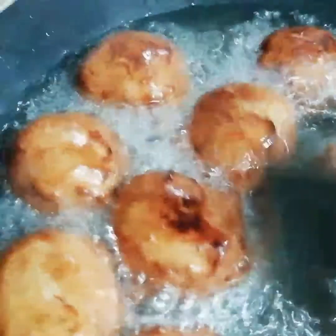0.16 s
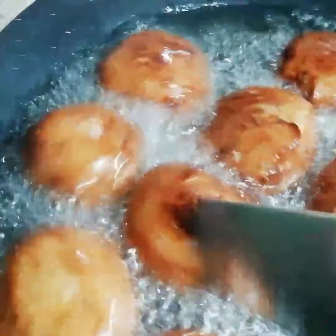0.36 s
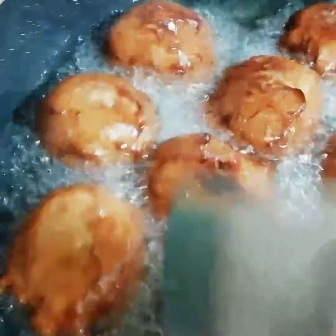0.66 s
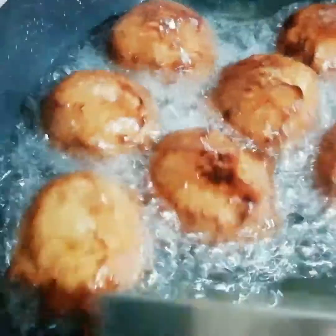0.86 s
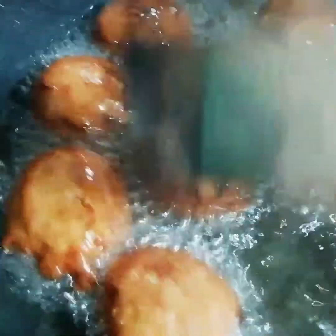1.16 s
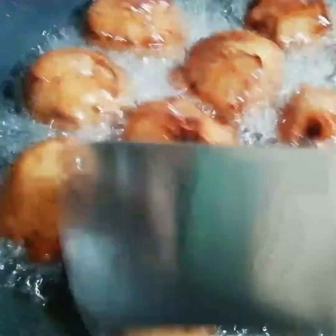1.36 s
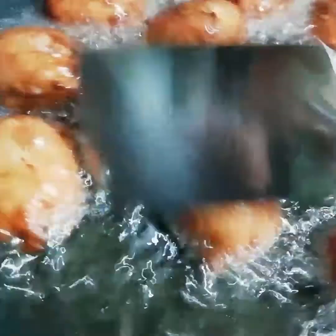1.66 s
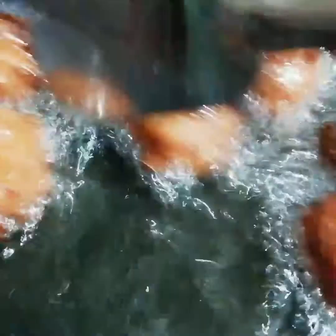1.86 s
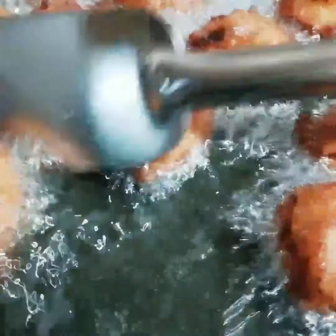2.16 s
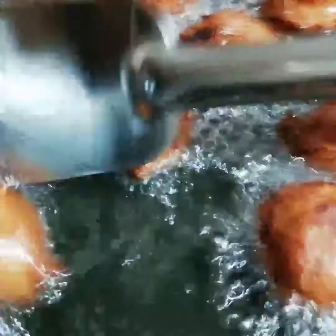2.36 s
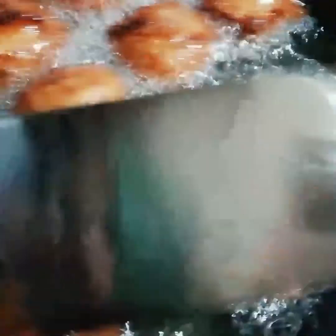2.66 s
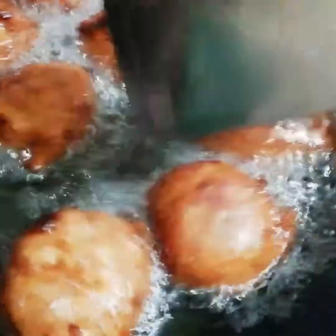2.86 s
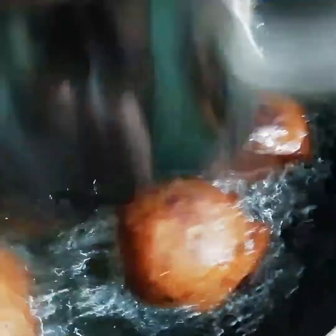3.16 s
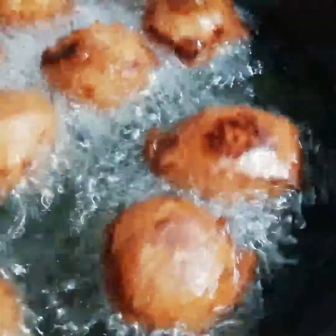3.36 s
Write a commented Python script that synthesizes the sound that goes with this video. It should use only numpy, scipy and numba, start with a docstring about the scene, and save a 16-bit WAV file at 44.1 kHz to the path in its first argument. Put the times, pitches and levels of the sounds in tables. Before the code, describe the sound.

Hot oil fizzes thinly and brightly throughout, close up, over a low wavering fan hum that grows slightly. A faint low plop comes at 0.1 s; dense crackle, sharp pops and small plops fill 0.45-1.0 s. A lull follows, with a click and plop near 1.55 s. Spitting resumes from 1.6 s, a soft dull ladle knock at 1.9 s, then irregular snapping flurries until 3.4 s. Short kitchen reverberation.

```python
"""Deep-frying in hot oil

Dough balls fry in a pan: tiny steam bubbles fizz all the time, each a short damped vibration.
As a ladle stirs, water meets the oil in flurries of clumped bubble bursts, with sharp single pops
(damped rings with a noise snap), soft plops (lower rings with a splash) and one modal ladle knock.
An echo follows the oil; noise tails of pan and kitchen follow all but the fizz. A fan motor hums
behind: wavering sine tones over filtered noise."""
import sys
import numpy as np
from scipy import signal
from scipy.fft import rfft, irfft
from scipy.io import wavfile
from scipy.ndimage import uniform_filter1d
from numba import njit

SR = 44100
rng = np.random.default_rng(int(sys.argv[2]) if len(sys.argv) > 2 else 0)


def persist_wave(psi):
    """Save psi, clipped to +-1, as 16-bit WAV."""
    counts = np.round(np.clip(psi, -1, 1) * 32767).astype(np.int16)
    wavfile.write(sys.argv[1], SR, np.atleast_2d(counts).T)


N = 154350  # length in samples
TOP_HZ = 14000  # upper limit of the sound


def undb(db):
    """Level law: decibels to amplitude gain."""
    return 10 ** (np.asarray(db) / 20)


def unit(x):
    """Normalisation: scale to rms 1."""
    return x / np.sqrt(np.mean(x ** 2))


def curve(rows):
    """Level contour: gain over time, interpolated in decibels between (time_s, level_db) points."""
    return undb(np.interp(np.arange(N) / SR, *np.array(rows).T))


def walk(rate_hz):
    """Slow random fluctuation: held random values, smoothed twice, with a spread near 1."""
    hold = int(SR / rate_hz)
    steps = np.repeat(rng.standard_normal(N // hold + 1), hold)
    return 1.3 * uniform_filter1d(uniform_filter1d(steps, hold), hold)[:N]


def colour(x, points):
    """Minimum-phase filtering through (frequency_hz, gain_db) points; the result has rms 1."""
    hz, db = np.array(points).T
    f = np.maximum(np.fft.rfftfreq(4096, 1 / SR), 1)
    gain = undb(np.interp(np.log(f), np.log(hz), db))
    # folding the cepstrum onto positive times makes the filter causal
    cepstrum = irfft(np.log(gain))
    half = len(cepstrum) // 2
    cepstrum[1:half] *= 2
    cepstrum[half + 1:] = 0
    impulse = irfft(np.exp(rfft(cepstrum)))
    return unit(signal.fftconvolve(x, impulse)[:N])


def add(out, start_s, sound):
    """Superposition: mix a sound in at its time."""
    i = int(start_s * SR)
    out[i:i + len(sound)] += sound[:N - i]


def ring(hz, ring_ms, attack_ms):
    """Damped vibration: a sine with a rounded rise and exponential decay, its envelope peaking at 1."""
    ms = np.arange(SR // 25) * 1000 / SR
    envelope = (1 - np.exp(-(ms / attack_ms) ** 2)) * np.exp(-ms / ring_ms)
    return envelope / envelope.max() * np.sin(2 * np.pi * hz * np.arange(len(ms)) / SR)


def burst(decay_ms, points):
    """Impulsive noise: coloured noise of rms 1 under an exponential decay."""
    ms = np.arange(SR // 25) * 1000 / SR
    noise = colour(rng.standard_normal(2 * len(ms)), points)
    # the second half is free of the filter's onset
    return unit(noise[len(ms):2 * len(ms)]) * np.exp(-ms / decay_ms)


@njit
def grains(out, start, hz, cycles, size):
    """Bubble resonance: each grain is a rotating, decaying phasor that rings for a few cycles."""
    y = out.copy()
    for k in range(len(start)):
        life = cycles[k] * SR / hz[k]
        turn = np.exp(2j * np.pi * hz[k] / SR - 1 / life)
        phasor = size[k] + 0j
        for i in range(int(start[k]), min(len(y), int(start[k] + 6 * life))):
            y[i] += phasor.imag
            phasor *= turn
    return y


def bubbles(per_s, low_hz, high_hz, cycles, spread_db, size=N):
    """Random superposition: bubbles burst at independent times, mostly weak and a few strong."""
    when, pitch, life, chance = rng.random((int(per_s * size / SR), 4)).T
    strength = -np.log(.04 + .96 * chance)  # near-exponential, with a ceiling
    hz = low_hz + (high_hz - low_hz) * pitch
    return grains(np.zeros(size), when * size, hz, cycles * (.5 + life), undb(spread_db * strength))


def hollow(x):
    """Band rejection: a partial notch dips the lower treble of the sizzle to 62 percent at its centre."""
    centre_hz, width_hz, depth = 3500, 390, 0.38
    b, a = signal.iirnotch(centre_hz, centre_hz / width_hz, fs=SR)
    return x + depth * (signal.lfilter(b, a, x) - x)


# level of the steady fizz before its notch: time_s [s], level_db [dB rms]
FIZZ_LEVEL = [(0, -45), (.3, -44), (.7, -42.5), (1.1, -43.5), (1.45, -44.5), (1.9, -43), (2.4, -43),
              (3., -42), (3.5, -40.5)]
# filter shaping the fizz: frequency_hz [Hz], gain_db [dB, relative]
FIZZ_FILTER = [(1200, -24.5), (2500, -15), (4000, -12), (5800, -11), (7000, -4), (8200, 4), (9300, -2),
               (11000, -7.5), (14000, -9.5)]


def fizz():
    """Dense random superposition: countless tiny bubbles merge into a hiss, with lone ticks among them."""
    hiss = unit(bubbles(per_s=6000, low_hz=1405, high_hz=TOP_HZ, cycles=1.0, spread_db=1))
    ticks = unit(bubbles(per_s=260, low_hz=2500, high_hz=11260, cycles=4.1, spread_db=2.0))
    tick_db = -9  # relative to the hiss
    return curve(FIZZ_LEVEL) * colour(hiss + undb(tick_db) * ticks, FIZZ_FILTER)


# level of the blade tone, before its wavering: time_s [s], level_db [dB rms]
BLADE_LEVEL = [(0, -50.5), (.55, -50), (1.2, -49.5), (2., -47.5), (3.5, -45)]
# motor lines, before their wavering: pitch_hz [Hz], level_db [dB rms]
MOTOR_LINES = [(59, -85), (139, -64.5), (372, -66.5), (426, -57), (639, -64), (745, -67), (1064.5, -66.5),
               (1863, -68)]
# filter shaping the rush of air: frequency_hz [Hz], gain_db [dB, relative]
AIR_FILTER = [(25, -21), (55, -2), (75, -5), (100, -5), (140, 4.5), (190, -6.5), (260, 2), (340, 1),
              (470, 5.5), (620, -9.5), (950, -6), (1300, -10.5), (2000, -14.5), (4000, -23.5)]


def fan():
    """Tonal and broadband noise: a blade tone and weaker motor lines waver over the rush of air."""
    blade_hz, air_db = 114.2, -46

    def tone(hz, waver):
        """Frequency modulation: a sine of rms 1 whose pitch drifts by a small fraction."""
        pitch_hz = hz * (1 + waver * walk(6))
        return np.sqrt(2) * np.sin(2 * np.pi * np.cumsum(pitch_hz) / SR)

    blade = curve(BLADE_LEVEL) * undb(.5 * walk(8.43)) * tone(blade_hz, waver=0.0049)
    motor = sum(undb(db + 0.61 * walk(4.35)) * tone(hz, waver=0.00147) for hz, db in MOTOR_LINES)
    air = undb(air_db) * colour(rng.standard_normal(N), AIR_FILTER)
    return blade + motor + air


def splash(hz):
    """Noise excitation: a soft puff coloured around the pitch that it accompanies."""
    level_db, decay_ms, octaves_above = -13.5, 3, 0.6  # the level is relative to the ring's peak
    points = [(hz / 4, -12), (hz / 2, -4), (hz, 0), (hz * 2 ** octaves_above, -12), (hz * 4, -30)]
    return undb(level_db) * burst(decay_ms, points)


# soft plops: start_s [s], level_db [dB, peak of the ring's envelope], pitch_hz [Hz], ring_ms [ms]
PLOP_EVENTS = [(.1025, -43.5, 670, 9.3), (0.102, -35.5, 1320, 3.8), (0.6238, -27.5, 2500, 0.68),
               (0.686, -34, 2950, 1.5), (0.805, -27, 4070, 1.6), (1.022, -28, 5270, .25),
               (1.030, -27, 5300, .4), (1.144, -39.5, 3730, 1.8), (1.562, -29.5, 2090, 0.83)]


def plops():
    """Bubble resonance: stirred oil plops as lower damped rings, each with a small splash."""
    out = np.zeros(N)
    for start, db, hz, ring_ms in PLOP_EVENTS:
        add(out, start, undb(db) * (ring(hz, ring_ms, attack_ms=0.35) + splash(hz)))
    return out


# modes of the ladle: pitch_hz [Hz], level_db [dB, relative to the knock's level], ring_ms [ms]
LADLE_MODES = [(245, -8, 14), (890, -5.5, 7), (1730, 3, 1.5), (2070, 2, 1.4), (2800, 3, 1.3)]


def knock():
    """Modal vibration: the ladle knocks once, its modes damped by the oil and each with a splash."""
    start_s, level_db = 1.8895, -32
    out = np.zeros(N)
    for hz, db, ring_ms in LADLE_MODES:
        add(out, start_s, undb(level_db + db) * (ring(hz, ring_ms, attack_ms=0.21) + splash(hz)))
    return out


def spits():
    """Clustered bursts: irregular kicks decay exponentially over a weaker even share, to rms 1."""
    mean_gap_s, decay_ms, spread_db, even_db = .007, 1.8, 5.5, -24
    gap, chance = rng.random((1000, 2)).T
    when = np.cumsum(mean_gap_s * (.15 + 1.7 * gap)) * SR
    inside = when < N
    kicks = np.zeros(N)
    np.add.at(kicks, when[inside].astype(int), undb(-spread_db * chance[inside]))
    surge = signal.lfilter([1], [1, -np.exp(-1000 / (decay_ms * SR))], kicks)
    return unit(surge + undb(even_db))


# flurries: centre_s [s], half_length_s [s, to 1/e of the power],
# small_db and large_db [dB, levels of small and larger bubbles before the common offsets]
FLURRY_EVENTS = [(0.467, 0.045, -40.5, -45), (0.514, 0.026, -33, -41), (0.633, 0.025, -37.5, -41.5),
                 (0.693, 0.016, -41, -43), (0.727, 0.017, -32.5, -44), (0.775, 0.011, -33.5, -48),
                 (0.809, 0.011, -41, -39), (0.838, 0.019, -39, -48), (0.928, 0.084, -47, -51.5),
                 (1.608, 0.0044, -39, -45), (1.708, 0.014, -40, -40.5), (1.753, 0.0082, -39, -42.5),
                 (1.834, 0.042, -55, -52), (1.936, 0.021, -44, -41), (2.001, 0.014, -38, -42),
                 (2.032, 0.01, -40, -41), (2.094, 0.033, -39, -42), (2.235, 0.023, -35.5, -41.5),
                 (2.296, 0.015, -35, -35.5), (2.339, 0.0074, -38, -35.5), (2.395, 0.037, -38.5, -47.5),
                 (2.507, 0.0076, -28, -59), (2.546, 0.016, -36.5, -62), (2.654, 0.045, -39.5, -60),
                 (2.825, 0.016, -31.5, -41), (2.859, 0.012, -30.5, -42.5), (2.929, 0.037, -39, -52),
                 (3.071, 0.02, -33, -45), (3.135, 0.028, -34.5, -42), (3.194, 0.027, -36, -54),
                 (3.309, 0.075, -44.5, -53)]
# filter shaping the small bubbles: frequency_hz [Hz], gain_db [dB, relative]
SMALL_FILTER = [(2500, -25.5), (5000, -32.5), (6300, -7), (7400, 2.5), (8400, 6), (9400, -2), (11000, -14),
                (14000, -35)]


def crackle():
    """Amplitude modulation: flurries of small bright and larger, lower bubbles swell and spit together.

    The tiniest bubbles follow the flurries but tick outside the clumps."""
    small_offset_db, large_offset_db = 1, 0.5
    tiny_db = -15.5  # relative to the small bubbles
    large_hz, large_octaves = 4440, 0.6  # centre pitch, and its spread either side
    even_share = 0.38  # share of the larger bubbles that ignores the clumps
    t = np.arange(N) / SR
    span = np.arange(-SR // 8, SR // 8) / SR
    small = colour(bubbles(per_s=3500, low_hz=4460, high_hz=TOP_HZ, cycles=2.9, spread_db=5), SMALL_FILTER)
    tiny = unit(bubbles(per_s=320, low_hz=9350, high_hz=13800, cycles=3.9, spread_db=9.5))
    clumps = spits()
    larger, small_power = np.zeros(N), np.zeros(N)
    for centre, half, small_db, large_db in FLURRY_EVENTS:
        small_power += np.exp(-((t - centre) / half) ** 2) * undb(small_db + small_offset_db) ** 2
        large = bubbles(per_s=2200, low_hz=large_hz / 2 ** large_octaves,
                        high_hz=large_hz * 2 ** large_octaves,
                        cycles=1.27, spread_db=8.5, size=len(span))
        large = unit(np.gradient(large))  # the slope favours the treble
        swell = np.exp(-(span / half) ** 2 / 2)
        add(larger, centre + span[0], undb(large_db + large_offset_db) * large * swell)
    clumped_larger = larger * (even_share + (1 - even_share) * clumps)
    return clumped_larger + (small * clumps + undb(tiny_db) * tiny) * np.sqrt(small_power)


# ringing steam pops: start_s [s], level_db [dB, before a common offset], pitch_hz [Hz], ring_ms [ms]
POP_EVENTS = [(0.4877, -17, 8150, 0.8), (0.5072, -14, 8250, 0.72), (0.5765, -16, 9600, 0.27),
              (0.5832, -9, 7190, 1.07), (0.7048, -16, 11200, 0.14), (0.7232, -18, 9800, .5),
              (0.727, -21, 10300, .6), (0.737, -16, 8460, 0.41), (0.7722, -19, 7330, 1.2),
              (0.788, -22.5, 9700, 1.1), (0.8644, -14, 7580, .8), (0.867, -16, 7720, 0.62),
              (0.8792, -11.5, 8600, 1.3), (0.9114, -12, 6620, 0.48), (0.9145, -32, 6330, 8),
              (1.696, -25, 8100, 1.2), (1.709, -21, 7750, .9), (1.7289, -19, 7700, 0.73),
              (1.9976, -18, 8480, 1.2), (2.0279, -16.5, 8630, 0.8), (2.0783, -10.5, 8100, 0.54),
              (2.082, -12, 8940, 0.52), (2.219, -19.5, 8540, 0.63), (2.2833, -16.5, 7000, 0.29),
              (2.3009, -15, 9040, 0.89), (2.34, -16, 8250, 1.3), (2.3694, -13.5, 8340, 1.4),
              (2.372, -14.5, 8660, 1), (2.387, -7, 7660, 0.37), (2.7134, -7.5, 7440, 0.48),
              (2.822, -20, 7300, 0.98), (2.8597, -14, 8150, 0.59), (3.1017, -9, 9400, 0.14),
              (3.1689, -22, 6530, 0.41), (3.279, -18.5, 7000, 0.67)]
# dry clicks of thin bubbles: start_s [s], level_db [dB, peak of the ring's envelope]
CLICK_EVENTS = [(0.499, -14), (.5212, -19), (.5503, -18), (.6508, -21), (.6663, -21), (0.6737, -15),
                (0.686, -20), (0.8236, -21), (.8677, -15), (0.887, -23), (.975, -18), (1.5452, -13.5),
                (1.72, -22), (1.804, -20.5), (1.831, -19.5), (1.9383, -20), (1.9739, -18.5), (2.0344, -21),
                (2.0936, -24), (2.133, -23), (2.17, -23), (2.1115, -24), (2.2248, -20), (2.231, -21),
                (2.2428, -27), (2.2485, -22), (2.298, -12), (2.5, -16), (2.5412, -16), (2.6244, -23),
                (2.6592, -13), (2.6728, -19), (2.6785, -14), (2.69, -21), (2.793, -20), (2.7995, -19),
                (2.8372, -11), (2.8575, -16), (2.964, -19.5), (3.0778, -19), (3.086, -19), (3.1199, -11.5),
                (3.1222, -18), (3.1453, -12), (3.1873, -19), (3.1962, -13.5), (3.225, -20), (3.26, -17),
                (3.2754, -16)]
# filter shaping the snap of both: frequency_hz [Hz], gain_db [dB, relative]
SNAP_FILTER = [(1000, -23), (3000, -6.5), (5000, 4.5), (9000, 9), (14000, 0.5)]


def pops():
    """Cavity resonance: a bursting drop snaps and rings briefly; thin bubbles click, all at one pitch."""
    rise_ms = .18
    pop_offset_db, pop_snap_db, pop_snap_ms = 1, -15, 0.71  # snap levels are relative to the ring
    click_hz, click_ms, click_snap_db, click_snap_ms = 8100, 0.28, -12, 0.52
    out = np.zeros(N)
    for start, db, hz, ring_ms in POP_EVENTS:
        snap = undb(pop_snap_db) * burst(pop_snap_ms, SNAP_FILTER)
        add(out, start, undb(db + pop_offset_db) * (ring(hz, ring_ms, rise_ms) + snap))
    for start, db in CLICK_EVENTS:
        snap = undb(click_snap_db) * burst(click_snap_ms, SNAP_FILTER)
        add(out, start, undb(db) * (ring(click_hz, click_ms, rise_ms) + snap))
    return out


def reflections(x, t60_s, count=4):
    """Diffuse reverberation: decaying noise tails, a random one of a few for each short stretch of sound."""
    t = np.arange(SR // 2) / SR
    spot = np.repeat(rng.integers(0, count, N // 512 + 1), 512)[:N]  # which spot of the pan sounds
    out = np.zeros(N)
    for k in range(count):
        decay = np.exp(-np.log(1000) * t / t60_s)  # falls 60 dB in t60_s
        tail = rng.standard_normal(len(t)) * decay * (t > .001)
        tail = tail / np.sqrt(np.sum(tail ** 2))
        share = uniform_filter1d(1. * (spot == k), size=64)
        out += signal.fftconvolve(x * share, tail)[:N]
    return out


def scene():
    """Superposition: direct oil sounds, one near echo, the pan's and kitchen's reflections, and the fan."""
    echo_s, echo_db = .00305, -11
    pan_db, pan_t60_s, room_db, room_t60_s = -4, 0.042, -10.5, 0.37
    events = hollow(crackle() + pops()) + plops() + knock()
    steady = hollow(fizz())
    direct = events + steady
    echo = np.interp(np.arange(N) - echo_s * SR, np.arange(N), direct, left=0)
    pan = undb(pan_db) * reflections(events, pan_t60_s)
    room = undb(room_db) * reflections(events, room_t60_s)
    return (direct + undb(echo_db) * echo + pan + room + fan())[None]


def record(dry):
    """Band limitation: a steep elliptic low-pass cuts the top."""
    lowpass = signal.ellip(10, .2, 70, TOP_HZ, fs=SR, output="sos")  # ripple, stopband [dB]
    return signal.sosfilt(lowpass, dry)


dry = scene()
out = record(dry)
persist_wave(out)
```